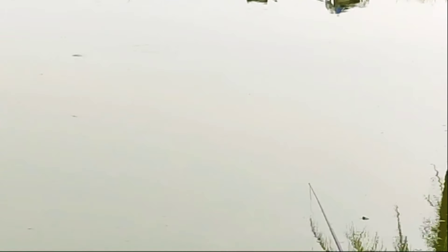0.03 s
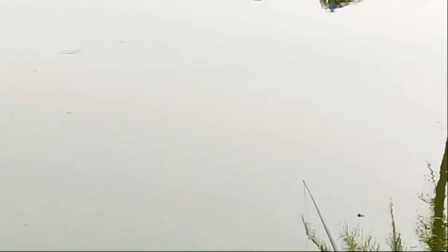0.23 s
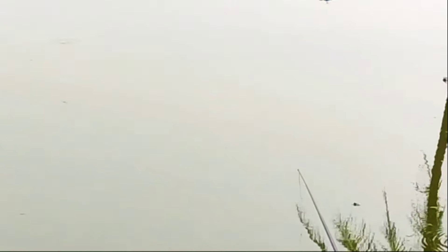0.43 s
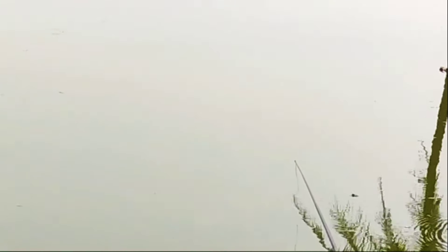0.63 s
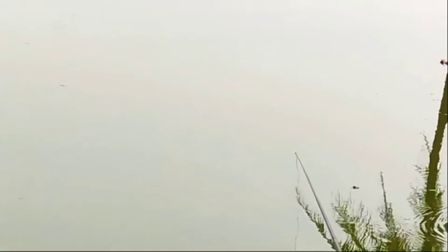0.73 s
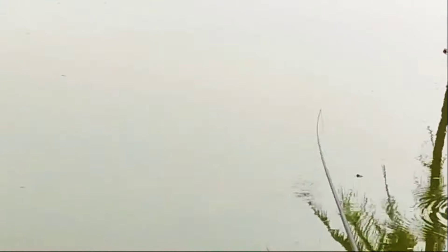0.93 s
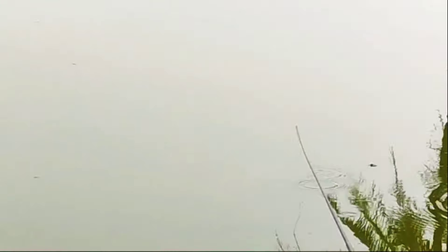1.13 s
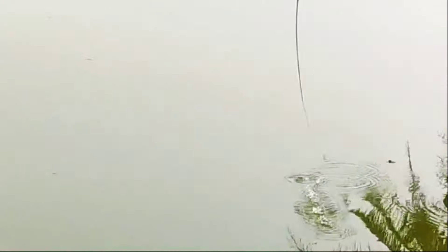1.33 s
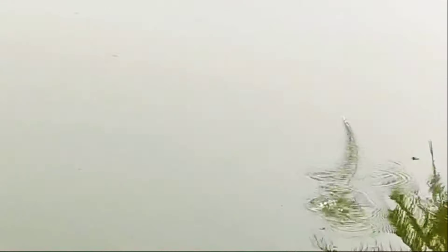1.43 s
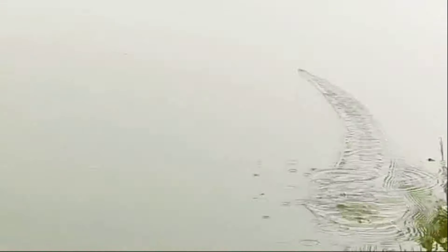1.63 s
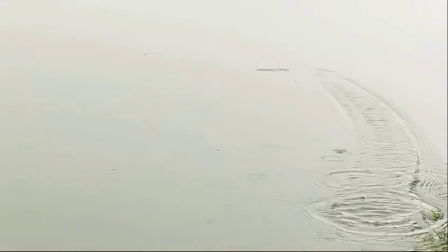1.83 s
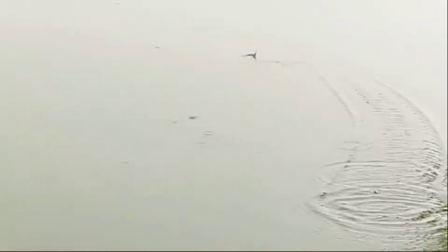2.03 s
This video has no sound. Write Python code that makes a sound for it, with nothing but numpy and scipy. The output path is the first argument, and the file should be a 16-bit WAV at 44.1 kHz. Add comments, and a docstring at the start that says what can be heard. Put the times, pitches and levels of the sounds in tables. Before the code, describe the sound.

A fishing rod and line swish through pond water with splashing and drips.

```python
"""A fishing rod sweeps up in a close, bright swish of stick-slip friction with two sharp snags in it.
The angler's grip knocks first, exciting damped modes; then the line cuts the still pond, and the
water sprays, drips and gurgles with the resonance of bubbles.
A bush cricket stridulates on the left over a low outdoor rumble."""
import sys
import numpy as np
from scipy import signal
from scipy.fft import rfft, irfft
from scipy.io import wavfile

SR = 44100
rng = np.random.default_rng(int(sys.argv[2]) if len(sys.argv) > 2 else 0)


def dump_mix(stems):
    """Bounce the given channels to the path in sys.argv[1] as a 16-bit WAV at rate SR."""
    frames = np.atleast_2d(stems).T  # one column per channel
    limited = np.clip(frames, -1, 1)  # hard clip at full scale
    pcm = np.round(limited * 32767).astype(np.int16)
    wavfile.write(sys.argv[1], SR, pcm)


N = 92610
T = np.arange(N) / SR
SWEEP_START_S, SWEEP_ATTACK_S = 0.9, 0.0039
GRAINS_PER_S, GRAIN_SPREAD_DB = 11000, 5.5


# Envelopes of the bright swish and the low scrape (t/s, relative level/dB)
SWISH_LEVEL = [(.899,-39),(.908,-30.5),(.918,-26.5),(.95,-29.5),(.975,-35.5),(1.008,-41.5),(1.1,-33),(1.134,-34.5),(1.2,-27.5),(1.235,-29.5),(1.3,-29),(1.36,-27),(1.388,-27.5),(1.412,-29),(1.445,-31),(1.495,-29),(1.525,-32.5),(1.56,-32),(1.595,-40.5),(1.635,-38),(1.7,-42),(1.735,-36.5),(1.78,-45),(1.84,-38),(1.872,-47.5),(1.93,-41.5),(1.97,-51.5),(2.1,-52.5)]
SCRAPE_LEVEL = [(.899,-36),(.917,-28),(.95,-31),(.98,-40),(1.12,-40.5),(1.2,-28),(1.24,-36),(1.38,-27.5),(1.41,-30.5),(1.435,-29),(1.465,-34.5),(1.49,-29.5),(1.55,-35.5),(1.595,-47.5),(1.635,-36),(1.72,-47.5),(1.81,-50),(1.845,-41.5),(1.88,-45),(2.1,-55.5)]
# Modes of the hollow rod (f/Hz, relative level/dB)
ROD_MODES = [(700,-9),(1045,-3),(1180,-9),(1331,-5.5),(1498,-3.5),(1622,0),(1689,2.5),(1816,-5),(2227,1)]
def sweep(swish_db=-0.5, scrape_db=-2, rod_db=-11.5):
    """Forced vibration: juddering friction hisses, scrapes and drives the modes of the rod."""
    judder_db = 1.32 * drift(70)
    treble = from_db(in_time(SWISH_LEVEL)[0] + swish_db + judder_db)
    body = from_db(in_time(SCRAPE_LEVEL)[0] + scrape_db + judder_db)
    slips = grains(GRAINS_PER_S, GRAIN_SPREAD_DB)
    rod = sum(from_db(db) * ring(slips, hz, t60=0.15) * (-1) ** k for k, (hz, db) in enumerate(ROD_MODES))
    hiss = near_echoes(near_echoes(friction(*SWISH_SPECTRA)))
    scrape = friction(*SCRAPE_SPECTRA) + from_db(rod_db) * rms_one(rod) * pan(-3)
    attack = np.clip((T - SWEEP_START_S) / SWEEP_ATTACK_S, 0, 1)
    return attack * (treble * hiss + body * scrape)


# Resonances of the rubbing on each side (f/Hz, spectral level/dB)
SWISH_L = [(900,-28),(2000,-8.5),(2450,-14),(2900,-4.5),(3600,-3.5),(4400,-8),(6500,-7.5),(7400,-25),(8400,-10),(9400,-9.5),(10400,3),(11800,0),(13000,-4),(13600,-10),(15300,-15)]
SWISH_R = [(900,-28),(2000,-7),(2450,-13.5),(2900,-6.5),(3600,-5),(4400,-11),(5400,-5),(6100,-6.5),(6650,0.5),(7100,-9),(8300,-0.5),(9300,-10),(10300,-12),(11300,-16),(12100,-11.5),(15300,-24.5)]
SCRAPE_L = [(50,-27),(130,-6),(220,0.5),(480,-6.5),(750,-2.5),(1150,-4),(1700,-4),(2200,-6.5),(3500,-15)]
SCRAPE_R = [(50,-33),(130,-6),(220,0.5),(480,-6.5),(750,-2.5),(1050,-2),(1500,2),(1750,1.5),(2200,-6),(3500,-21.5)]
SWISH_SPECTRA, SCRAPE_SPECTRA = (SWISH_L, SWISH_R), (SCRAPE_L, SCRAPE_R)
# Left-right likeness of the rubbing (f/Hz, correlation)
FRICTION_CORRELATION = [(100,1),(300,1),(700,1),(1300,0.31),(2400,0),(4400,0)]
def friction(left, right):
    """Stick-slip friction: dense tiny slips are filtered by the resonances of each side."""
    slips = [grains(GRAINS_PER_S, GRAIN_SPREAD_DB) for _ in range(2)]
    return stereo(slips, left, right, FRICTION_CORRELATION)


def rub(treble, body):
    """Superposition of bright and low friction noise, each with its own gain."""
    return treble * friction(*SWISH_SPECTRA) + body * friction(*SCRAPE_SPECTRA)


def near_echoes(direct, count=10, gain=0.82, change_hz=7):
    """Comb filtering: reflections off near surfaces swell and fade, so peaks and notches wander."""
    echoes = np.zeros_like(direct)
    for echo, side in zip(echoes, direct):
        for lag_s in rng.uniform(0.0002, 0.003, count):
            echo += drift(change_hz) * np.interp(T - np.round(lag_s * SR) / SR, T, side)
    return (direct + gain * echoes / np.sqrt(count)) / np.sqrt(1 + gain ** 2)


# Snags and ticks (t/s, treble level/dB, body level/dB, decay time/s)
SLIP_BURSTS = [(0.4904,-28,-28,0.0008),(0.5257,-26,-34,0.00033),(0.5348,-26.5,-28,0.0022),(0.5518,-20.5,-21,0.00095),(1.2108,-7.5,-21,0.001),(1.271,-22,-28,0.0025),(1.4241,-15,-23.5,0.0039),(1.46,-34,-40,0.0027),(1.488,-24,-24,0.0046),(2.075,-26,-47.5,0.0014)]
def snags(rise_s=0.00042):
    """Friction transients: something catches and lets go within a few milliseconds."""
    treble = body = 0
    for onset, treble_db, body_db, decay_s in SLIP_BURSTS:
        burst = np.exp(-np.maximum((onset - T) / rise_s, (T - onset) / decay_s))
        treble += from_db(treble_db) * burst
        body += from_db(body_db) * burst
    return rub(treble, body)


# Cracks within the sharpest snags (t/s, level/dB, f/Hz, T60/s)
CRACK_TONES = [(.5247,-20,11500,.002),(1.2103,-10,1900,.005),(1.2104,-8,3630,.003),(1.2104,-7,6730,.0035),(1.2104,-8,11000,.002),(1.4243,-12,6400,.005),(1.4246,-14,1450,.012),(1.4246,-16,1800,.009),(1.4247,-22,700,.016)]
def cracks():
    """Heavy damping: tones die so fast that they are heard as dry cracks."""
    return pings(CRACK_TONES, rise_s=0.00014, glide=0)


# Knocks on the grip (t/s, impulse level/dB, contact time/s)
GRIP_KNOCKS = [(.348,-34,0.00016),(0.4887,-27.5,0.00012),(0.5276,-26,0.00011),(0.5363,-19,0.00033),(0.551,-10,0.00022),(0.561,-18,0.002)]
# Modes of the grip (f/Hz, level/dB, T60/s)
GRIP_MODES = [(134,-13,0.039),(302,-12.5,0.031),(366,-12,0.027),(700,-11.5,0.011),(1030,-5.5,0.0075),(1440,-10,0.005),(2100,-10.5,0.0053),(3200,-6,0.0045)]
def grip(slide_s=0.544, slide_width_s=0.015):
    """Impact excitation: soft knocks ring the damped grip, which slides before the main knock."""
    force = np.zeros(N)
    for onset, db, contact_s in GRIP_KNOCKS:
        pulse = np.exp(-(2 * (T - onset) / contact_s) ** 2)
        force += from_db(db) * pulse / (pulse.sum() + 1e-12)
    knocks = -sum(ring(force * from_db(db), hz, t60) for hz, db, t60 in GRIP_MODES)
    slide = np.exp(-((T - slide_s) / slide_width_s) ** 4)
    return high_pass(knocks, hz=90) * pan(6) + slide * rub(treble=from_db(-40.5), body=from_db(-36.5))


# Envelopes of the tearing surface and the hollow gurgle (t/s, level/dB)
TEAR_LEVEL = [(.88,-86),(.93,-38.5),(1.0,-51),(1.2,-48),(1.38,-39.5),(1.45,-42.5),(1.65,-48),(2.1,-59)]
GURGLE_LEVEL = [(.9,-72),(.915,-34),(.955,-44),(.985,-54),(1.005,-40.5),(1.08,-46),(1.17,-40),(1.28,-40),(1.385,-39.5),(1.44,-47),(1.51,-44),(1.56,-41),(1.6,-56),(2.1,-64)]
def splash():
    """Bubble resonance: the line tears the surface, and the water gurgles shut behind it."""
    tear = bubbles(cycles=15, low_hz=452, high_hz=1800) * from_db(in_time(TEAR_LEVEL)[0])
    gurgle = bubbles(cycles=51, low_hz=1176, high_hz=1896) * from_db(in_time(GURGLE_LEVEL)[0])
    return tear * pan(-0.5) + gurgle * pan(-2)


def bubbles(cycles, low_hz, high_hz, per_s=260, count=20):
    """Free oscillation: randomly excited bubbles each fall 60 dB in the given cycles; rms 1."""
    pitches = np.geomspace(low_hz, high_hz, count)
    return rms_one(sum(ring(grains(per_s / count, spread_db=1.5), hz, cycles / hz) for hz in pitches))


# Spray thrown up by the line (t/s, level/dB, half length/s, f/Hz, bandwidth/Hz, pan/dB)
SPRAY_SURGES = [(0.95,-39,.02,6630,1500,-3),(1.36,-42,0.0062,4000,1500,4),(1.388,-25.5,0.013,6540,2200,-1.5),(1.39,-37,.01,11200,1500,8),(1.459,-31.5,0.012,8150,600,-5),(1.501,-34,0.014,5800,900,-3),(1.5,-34,0.01,10900,2000,5)]
def spray():
    """Band-limited shot noise: each brief cloud of droplets hisses around its own pitch."""
    out = 0
    for peak_s, db, half_s, hz, width_hz, pan_db in SPRAY_SURGES:
        t60 = np.log(1000) / (np.pi * width_hz)
        drops = [ring(grains(GRAINS_PER_S, GRAIN_SPREAD_DB), hz, t60) for _ in range(2)]
        surge = from_db(db) * np.exp(-((T - peak_s) / half_s) ** 2)
        out += rms_one(np.gradient(drops, axis=1)) * surge * pan(pan_db)
    return out


def droplets(relative_db=-8.5):
    """Impact transients: lone droplets tick on the water, following the level of the swish."""
    ticks = np.array([bubbles(cycles=5, low_hz=3000, high_hz=13000) for _ in range(2)])
    return ticks * from_db(in_time(SWISH_LEVEL)[0] + relative_db) * (T > SWEEP_START_S)


# Plops and drops (t/s, level/dB, f/Hz, T60/s)
PLOP_TONES = [(.158,-42,2600,0.047),(1.028,-33,254,0.078),(1.332,-24,1630,.04),(1.372,-21,800,.035),(1.383,-22,1524,.04),(1.424,-25,230,0.057),(1.486,-25.5,517,0.023),(1.487,-18.5,770,0.027),(1.488,-33,300,0.019),(1.502,-23,1454,.05),(1.633,-30,1530,0.039),(1.662,-36,660,0.035),(1.728,-37,4500,0.027),(1.84,-33,860,.025),(1.843,-32,1726,0.037)]
def plops():
    """Damped resonance: each plop climbs in pitch as it fades."""
    return pings(PLOP_TONES, rise_s=0.002, glide=0.032)


# Song of the bush cricket (t/s, level/dB, f/Hz, phase flutter/rad)
CRICKET_SONG = [(0,-54.5,10040,.4),(.13,-53.5,10140,.4),(.145,-63.5,10400,1.5),(.3,-64,10300,1.1),(.38,-64,9850,1),(.52,-62.5,9880,1),(.62,-62.5,10150,1.1),(.79,-55,10050,0.54),(.9,-56,10100,0.61),(1.1,-55,9800,.6),(1.9,-83,9600,0.54)]
def cricket(strokes_per_s=97, fall_hz=840):
    """Stridulation: each wing stroke is a falling chirp, roughened by phase flutter."""
    db, hz, flutter = in_time(CRICKET_SONG)
    stroke_rate = strokes_per_s * (1 + 0.013 * drift(1.5) + 0.05 * drift(60))
    stroke = np.cumsum(stroke_rate) / SR % 1
    phase = 2 * np.pi * np.cumsum(hz + fall_hz * (0.5 - stroke)) / SR + flutter * drift(330)
    chirps = np.abs(np.sin(np.pi * stroke)) ** 1.7 * np.sin(phase)
    return rms_one(chirps) * from_db(db + drift(40)) * pan(7.5)


# Envelopes of the rumble and the air (t/s, level/dB)
RUMBLE_ENVELOPE = [(0,-38),(.13,-39.5),(.3,-38),(.42,-38),(.7,-39.5),(.76,-43.5),(.85,-37.5),(1.1,-40),(1.35,-48.5),(1.6,-47.5),(1.66,-40),(1.75,-48),(2.1,-44.5)]
AIR_ENVELOPE = [(0,-44.5),(.45,-46.5),(.85,-44.5),(1.3,-52),(2.1,-53.5)]
# Their spectra (f/Hz, spectral level/dB)
RUMBLE_SPECTRUM = [(20,-34),(38,-54),(55,-14),(80,0.5),(135,-1),(200,-7.5),(300,-16.5),(500,-28.5),(1000,-60)]
AIR_SPECTRUM = [(150,3),(400,3),(800,-5),(1500,-7.5),(2300,-11),(2700,-11),(3300,-13.5),(4700,-12.5),(5700,-16.5),(6600,-17),(7200,-21),(8500,-17),(12000,-18),(13500,-20.5),(15300,-25)]
# Their left-right likeness (f/Hz, correlation)
AMBIENT_CORRELATION = [(60,0.92),(150,0.95),(500,0.1),(2000,0.086),(8000,0.049)]
def outdoors():
    """Diffuse field: far rumble and soft open-air hiss are alike on both sides only in the bass."""
    out = 0
    for envelope, spectrum in (RUMBLE_ENVELOPE, RUMBLE_SPECTRUM), (AIR_ENVELOPE, AIR_SPECTRUM):
        noise = stereo(rng.standard_normal((2, N)), spectrum, spectrum, AMBIENT_CORRELATION)
        out += from_db(in_time(envelope)[0]) * noise
    return out


def pings(rows, rise_s, glide):
    """Damped sinusoids with a soft onset and a linear pitch glide."""
    out = np.zeros(N)
    for onset, db, hz, t60 in rows:
        age = np.maximum(T - onset, 0)
        envelope = from_db(db - 60 * age / t60) * (1 - np.exp(-age / rise_s))
        out += envelope * np.sin(2 * np.pi * hz * age * (1 + glide * age / t60))
    return out


def ring(clicks, hz, t60):
    """Two-pole resonator: each click starts a decaying sine."""
    radius, angle = from_db(-60 / (t60 * SR)), 2 * np.pi * hz / SR
    return signal.lfilter([0, np.sin(angle)], [1, -2 * radius * np.cos(angle), radius ** 2], clicks + 1e-18)


def grains(per_s, spread_db):
    """Poisson process: random clicks of uneven size."""
    sizes = from_db(spread_db * np.minimum(rng.exponential(1, N), 2)) * rng.choice([-1, 1], N)
    return sizes * (rng.random(N) < per_s / SR)


def drift(corner_hz):
    """Low-pass noise of rms 1."""
    hz = np.arange(N // 2 + 1) * SR / N
    return rms_one(irfft(rfft(rng.standard_normal(N)) / (1 + (hz / corner_hz) ** 2), N))


def stereo(pair, left, right, correlation):
    """Mid-side mixing: two independent signals get a correlation and a spectrum per side; rms 1."""
    mid, side = rfft(pair)
    alike = np.clip(at_hz(correlation), -1, 1)
    mid, side = mid * np.sqrt(1 + alike), side * np.sqrt(1 - alike)
    spectra = [(mid + side) * from_db(at_hz(left)), (mid - side) * from_db(at_hz(right))]
    return rms_one(irfft(spectra, N))


def pan(db):
    """Level difference: the left gains db and the right loses it."""
    return from_db([[db], [-db]])


def high_pass(x, hz):
    """Second-order bass roll-off."""
    return signal.sosfilt(signal.butter(2, hz, "high", fs=SR, output="sos"), x)


def in_time(rows):
    """Linear interpolation of each column at every sample."""
    times, *columns = np.transpose(rows)
    return [np.interp(T, times, column) for column in columns]


def at_hz(points):
    """Log-frequency interpolation at every bin."""
    hz, value = np.transpose(points)
    return np.interp(np.log(np.arange(N // 2 + 1) * SR / N + 1), np.log(hz), value)


def from_db(db):
    """Decibels to amplitude ratio."""
    return 10 ** (np.asarray(db) / 20)


def rms_one(x):
    """Normalisation to unit power."""
    return x / np.sqrt(np.mean(x ** 2) + 1e-20)


def scene():
    """Superposition of rod, water and background at the pond's edge."""
    rod = sweep() + snags() + cracks() + grip()
    water = splash() + spray() + droplets() + plops()
    return rod + water + cricket() + outdoors()


def record(dry):
    """Band limiting and saturation: deep bass is lost, peaks are rounded and the top is cut."""
    rounded = np.tanh(high_pass(dry, hz=55))
    low_pass = signal.ellip(12, 0.1, 80, 15600, fs=SR, output="sos")
    return signal.sosfilt(low_pass, rounded)


dry = scene()
out = record(dry)
dump_mix(out)
```